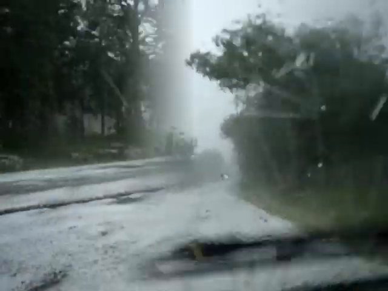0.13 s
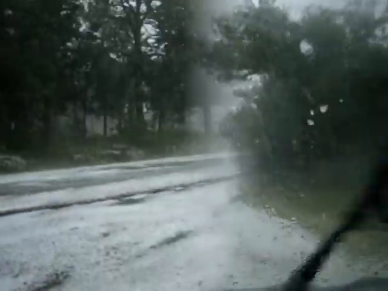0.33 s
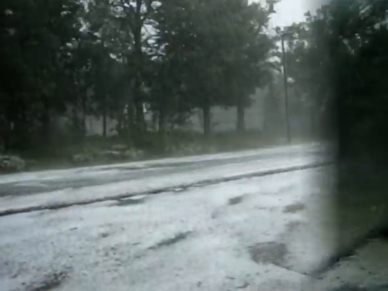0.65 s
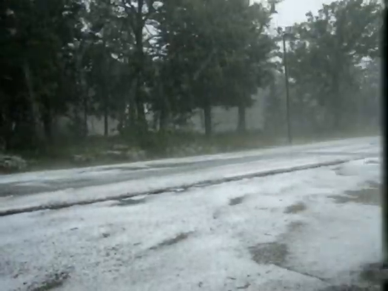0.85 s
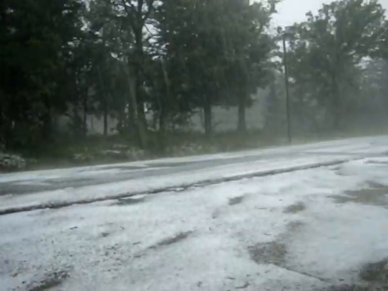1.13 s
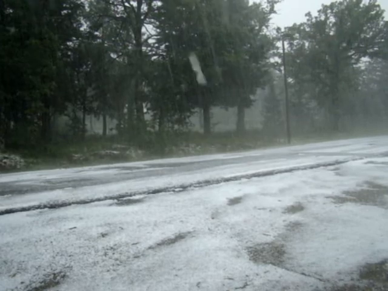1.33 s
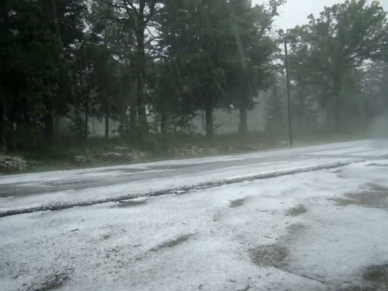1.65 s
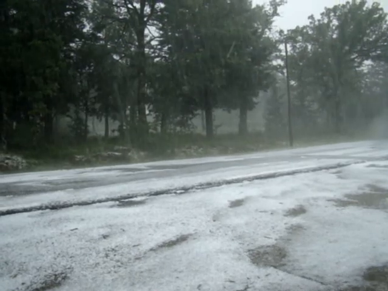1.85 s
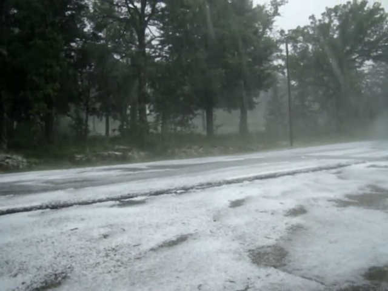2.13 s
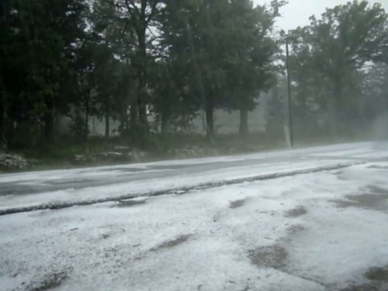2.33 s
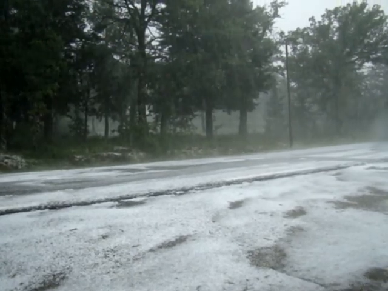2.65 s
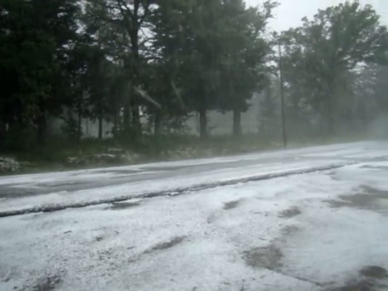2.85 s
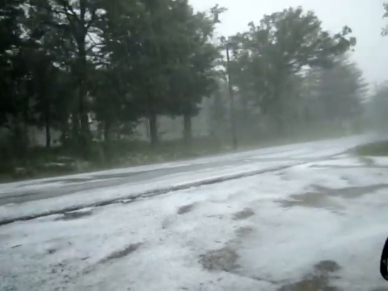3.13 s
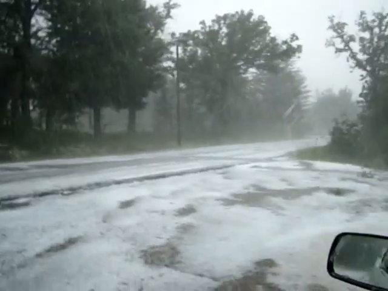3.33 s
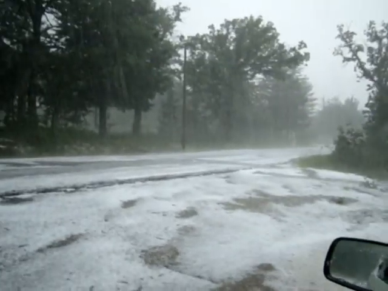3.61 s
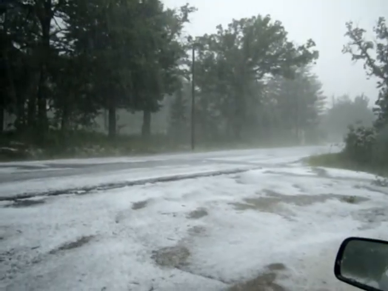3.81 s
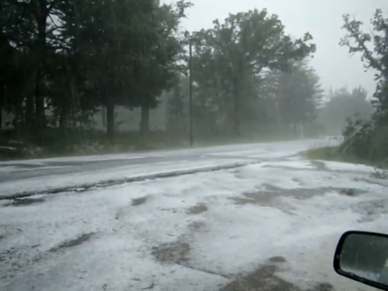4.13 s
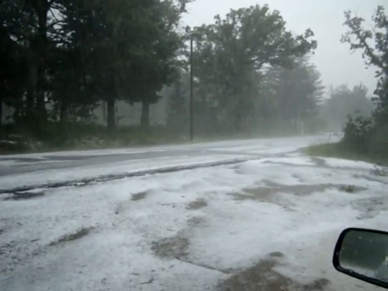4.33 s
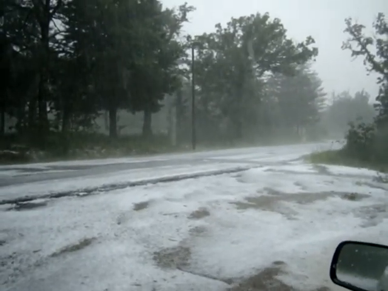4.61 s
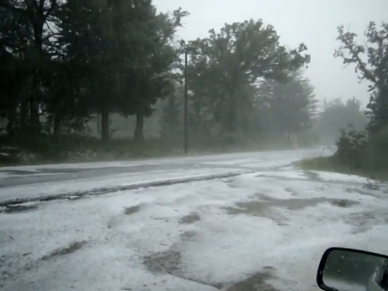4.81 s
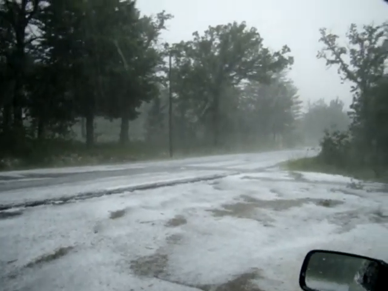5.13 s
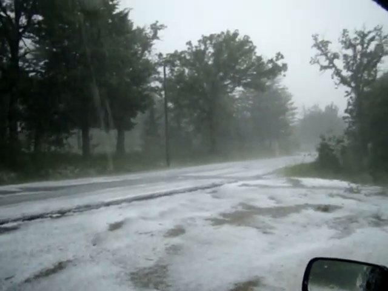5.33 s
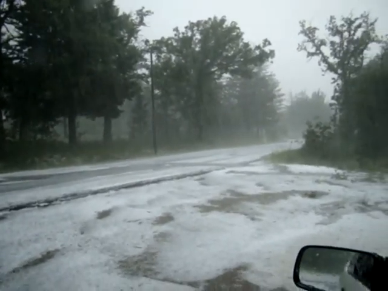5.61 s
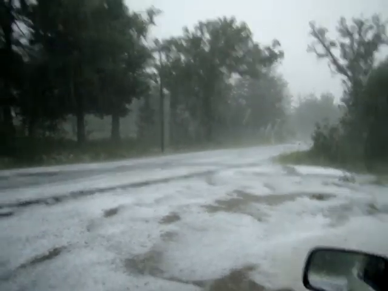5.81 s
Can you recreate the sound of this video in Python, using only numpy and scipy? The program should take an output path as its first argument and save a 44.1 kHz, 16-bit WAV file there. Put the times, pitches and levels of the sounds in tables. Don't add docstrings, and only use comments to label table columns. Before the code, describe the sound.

A violent hailstorm beats on a parked car, heard close up from the cabin in mono through a small, straining microphone. From the start, a dense wash of rain and small hail roars steadily, with fine, rattling patter inside it. Large stones crack at once and again around 0.3 seconds, short and glassy, with dull roof knocks between. At about 0.9 seconds the sound shifts from behind the windscreen to an open side window, becoming a little fuller and more exposed. Hard pops near 1.3, 2.0 and 2.9 seconds hit the microphone itself, and the whole storm ducks for an instant before springing back. Clusters of bright cracks come around 1.6, 2.8 and 3.3 seconds, with hollow metal raps scattered throughout. The roar flutters in brief surges and gaps. Sharp strikes continue near 4.7 and 5.4 seconds, then a final flurry of knocks runs to six seconds, with no let-up.

```python
import sys
import numpy as np
from scipy import signal
from scipy.io import wavfile
from scipy.ndimage import uniform_filter1d

SR = 44100
rng = np.random.default_rng(int(sys.argv[2]) if len(sys.argv) > 2 else 0)


def volts_from_db(level):
    exponent = np.asarray(level, float) / 20
    return 10 ** exponent


def int16_out(signal):
    q = np.round(np.clip(np.atleast_2d(signal).T, -1, 1) * 32767)
    wavfile.write(sys.argv[1], SR, q.astype(np.int16))


N = 263277
CUT_S = 0.88


def evened(x):
    return x / np.sqrt(np.mean(x ** 2) + 1e-20)


def read(points, hz):
    f, value = np.transpose(points)
    return np.interp(np.log(hz + 1), np.log(f + 1), value)


def add(mix, s, sound):
    part = mix[round(s * SR):][:len(sound)]
    part += sound[:len(part)]


def train(per_s, spread_db):
    size = volts_from_db(spread_db * np.minimum(rng.exponential(1, N), 5))
    return size * (rng.random(N) < per_s / SR)


def burst(hz, t60, width, count=1800):
    t = np.arange(count) / SR
    modes = hz * np.exp(width * rng.standard_normal((9, 1)))
    life = t60 * rng.uniform(0.14, 1, (9, 1))
    swing = np.sin(2 * np.pi * np.minimum(modes, SR / 4) * t)
    ring = (-swing * volts_from_db(-60 * t / life)).sum(0)
    return ring / abs(ring).max()


GLASS_T60, ROOF_T60 = 0.0056, 0.013


def strays(count=60):
    level_db, spread_db, behind_glass_db = -11.5, 1, -4
    pitch_hz, pitch_spread = 4600, 0.097
    times = (np.arange(count) + rng.random(count)) / count * N / SR
    rows = []
    for s, (b, c) in zip(times, rng.standard_normal((count, 2))):
        peak_db = level_db + spread_db * b + behind_glass_db * (s < CUT_S)
        rows.append((s, peak_db, pitch_hz * np.exp(pitch_spread * c), GLASS_T60))
    return rows


# (time [s], peak level [dB], pitch [Hz])
GLASS_STONES = [(.006, -8.5, 3560), (0.2908, -16, 3800), (.315, -10, 3380), (.334, -5, 3760),
                (1.022, -5, 5670), (1.0333, -8, 3550), (1.197, -5.5, 4630), (1.3848, -15, 3610),
                (1.5596, -2, 4570), (1.569, -8, 4830), (1.6022, -3.5, 5110), (1.643, -3, 5350),
                (1.9801, -8, 5300), (2.142, -11, 4600), (2.7542, -6, 3950), (2.807, -3.5, 5300),
                (2.865, -9, 4400), (3.023, -11, 4860), (3.1687, -4.5, 6800), (3.314, -6, 5330),
                (3.357, -9, 4600), (3.4603, -2.5, 5060), (3.7526, -14, 4540), (4.2975, -5, 5030),
                (4.663, -1.5, 5500), (4.879, -6.5, 3760), (5.366, -0.5, 5320), (5.5067, -14, 4300),
                (5.528, -11, 4200), (5.8815, -9, 4790)]
# (time [s], peak level [dB], pitch [Hz])
ROOF_STONES = [(.006, -13, 1720), (0.5195, -19, 1540), (0.6288, -12, 1330), (1.0336, -9, 1490),
               (1.1612, -11, 1330), (1.378, -12, 1500), (1.7438, -11, 1230), (1.9952, -15, 1180),
               (2.513, -8.5, 1460), (2.6012, -10, 1310), (2.6253, -12, 1460), (3.1062, -14, 1270),
               (3.3138, -13, 1420), (3.8923, -9.5, 1470), (4.0782, -11.5, 1350), (4.0876, -15, 1430),
               (4.5981, -14, 1260), (4.9665, -13, 1180), (5.415, -14, 1540), (5.4896, -12, 1550),
               (5.5517, -8, 1420), (5.6929, -9, 1250), (5.949, -15, 1330)]


def stones():
    out, t = np.zeros(N), np.arange(1800) / SR
    hits = [(s, db, hz, GLASS_T60) for s, db, hz in GLASS_STONES]
    hits += [(s, db - 1, hz, ROOF_T60) for s, db, hz in ROOF_STONES]
    for s, peak_db, hz, t60 in hits + strays():
        splash = signal.butter(2, [0.6 * hz, 1.6 * hz], "bandpass", fs=SR, output="sos")
        shards = evened(signal.sosfilt(splash, rng.standard_normal(len(t)))) * volts_from_db(-60 * t / 0.059)
        onset = 1 - np.exp(-t * hz / 0.6)
        ring = burst(hz, 2 * t60 + 24 / hz, 0.13) * onset
        add(out, s, volts_from_db(peak_db + 2) * (ring + volts_from_db(-17) * shards))
    return signal.sosfilt(signal.butter(4, 380, "highpass", fs=SR, output="sos"), out)


# (time
# [s], limiter depth [dB], tick peak level [dB], bass shove level [dB])
STRIKES = [(0.1975, -4.5, -8, -56), (0.4093, 1, 2, -55), (0.8463, 1.6, -14, -62), (1.034, -0.5, -6, -57),
           (1.1635, 1.5, 6, -55), (1.2963, 7, 11, -45), (1.505, -1.5, -28, -47), (1.611, 3.3, -14, -49),
           (1.706, -1, 0, -59), (2.006, 8, 12.5, -38), (2.164, 2, -3, -56), (2.1913, 0, -4, -53),
           (2.4816, 4, -10, -47), (2.549, 3.2, 5, -48), (2.888, 6.5, 6, -54), (3.0037, 3, -14, -65),
           (3.3929, -1.5, -5, -59), (3.424, 5, -28, -64), (3.704, 1.6, -12, -47), (3.856, 4.6, -4, -52),
           (3.9902, 4, -6, -63), (4.099, 3.5, -15, -54), (4.6303, 4.5, -24, -48), (4.665, 3.5, -26, -54),
           (4.8476, -3, -11, -60), (4.922, 3, -16, -55), (5.1173, 2, -20, -47), (5.3662, -3, 3, -80),
           (5.5397, -1.0, -13, -50), (5.884, -5.5, -4, -60)]


def spikes():
    ticks, shoves = volts_from_db(-24) * train(120, 2.5), volts_from_db(-16) * train(15, 2.2)
    for s, _, peak_db, shove_db in STRIKES:
        ticks[round(s * SR)] += volts_from_db(peak_db - 10)
        shoves[round(s * SR)] += volts_from_db(shove_db + 44) + volts_from_db(peak_db - 20)
    u = np.arange(-40, 41)
    tick = (1 - 2 * (u / 3.67) ** 2) * np.exp(-(u / 2.96) ** 2)
    window = np.hanning(len(u))
    tick = tick - tick.sum() * window / window.sum()
    shove = np.exp(-(u / 9) ** 2)
    shove = shove / shove.sum()
    return -signal.oaconvolve(ticks, tick, "same") - signal.oaconvolve(shoves, shove, "same")


def patter():
    total = np.zeros(N)
    for hz in 1300 + 8200 * rng.random(36) ** 1.097:
        ring = burst(hz, 0.009 + 22 / hz, 0.2)
        total += signal.oaconvolve(train(30, 2.3), ring / np.linalg.norm(ring))[:N]
    return evened(total)


def wash():
    frames = N // 64 + 5
    a, b, patches = rng.standard_normal((frames, 129, 3)).T
    patches = evened(uniform_filter1d(uniform_filter1d(patches, size=9, axis=0), size=9, axis=1))
    flicker = evened(uniform_filter1d(rng.standard_normal(frames), size=14))
    landing = rng.exponential(1, frames) * (rng.random(frames) < 0.09)
    volleys = signal.lfilter([1], [1, -0.82], landing)
    shared_db = 0.7 * flicker + 1.3 * evened(volleys - volleys.mean())
    reach = np.interp(np.arange(129), [1, 12], [0.1, 1])
    z = (a + 1j * b) * volts_from_db(1.12 * patches + np.outer(reach, shared_db))
    return evened(signal.istft(z, nperseg=256, noverlap=192)[1][:N])


# (time [s], level [dB], brightness [dB])
STORM = [(0, -26.5, -3), (.06, -30, 1), (.2, -30, -1.5), (.85, -28, 0.5), (.92, -25, -2), (1.4, -28, -0.5),
         (1.7, -27, -1), (2, -26, .5), (2.6, -25, -1.5), (3.2, -26.6, 0), (3.8, -26, -1),
         (4.1, -25.5, -1.5), (4.4, -26.5, -0.5), (5, -26, -1.5), (5.5, -27, -2), (5.75, -27, -1.5),
         (5.97, -27, -1.5)]
# (frequency [Hz], level per Hz [dB])
COLOUR = [(24, -50), (40, -28.5), (156, -19), (248, -14.5), (299, -8), (544, -3.5), (1310, -0.5),
          (2230, -4.5), (4770, 0.5), (6020, -1.5), (9330, -3.5), (10000, -1.5), (13000, -38), (22000, -120)]
# (frequency [Hz], change [dB])
WINDSCREEN = [(300, -0.5), (1200, 0), (2300, 2), (3200, 1.5), (4600, -2.5), (9000, -2)]


def storm():
    hz, t, z = signal.stft(wash() + volts_from_db(-5.5) * patter(), SR, nperseg=1024)
    z /= np.sqrt(uniform_filter1d((abs(z) ** 2).mean(1), size=9))[:, None]
    bass_loss_db = 36 * np.clip(np.log2(125 / (hz + 10)), 0, 3)
    z *= volts_from_db(read(COLOUR, hz) - bass_loss_db)[:, None]
    s, *columns = np.transpose(STORM)
    level_db, bright_db = (np.interp(t, s, c) for c in columns)
    body_db = 0.17 * level_db - 0.31 * bright_db
    fizz_db = 0.1 * level_db + 0.77 * bright_db
    low = np.interp(hz, [1800, 2800], [1, 0])
    high = np.interp(hz, [5200, 6800], [0, 1])
    tilt_db = np.outer(low, body_db - body_db.mean()) + np.outer(high, fizz_db - fizz_db.mean())
    behind_glass = np.clip((CUT_S - t) / 0.24, 0, 1)
    tilt_db = tilt_db + np.outer(read(WINDSCREEN, hz), behind_glass)
    z /= np.sqrt(np.mean(abs(z[(hz > 2500) & (hz < 6000)]) ** 2))
    return signal.istft(z * volts_from_db(level_db + tilt_db - 19), SR, nperseg=1024)[1][:N]


# (time [s], change [dB], width at half height [s])
SWELLS_AND_LULLS = [(0.112, 1.5, 0.02), (0.293, 4, 0.042), (0.627, 2, 0.017), (1.159, 1, 0.018), (1.383, 4, 0.014),
                    (1.604, 0.5, 0.02), (1.648, 2, 0.016), (1.736, 3, 0.015), (1.999, 0.5, 0.018), (3.257, 2.0, 0.1),
                    (3.362, 2, 0.022), (3.468, -1.5, 0.022), (3.502, 2, 0.018), (3.56, 1, 0.02), (4.087, 1, 0.018),
                    (4.59, 1.5, 0.07), (4.969, 2.5, 0.02), (5.316, 0.3, 0.03), (5.378, 0, 0.024), (5.529, 2, 0.02),
                    (5.607, 2.5, 0.022), (5.695, 2, 0.042), (5.739, 2.4, 0.036), (5.964, 1.5, 0.018),
                    (0.373, -1, 0.016), (0.716, -3.5, 0.018), (0.894, -2.5, 0.02), (0.997, -3, 0.032),
         (1.078, -2, 0.02), (1.684, -4, 0.013), (1.762, -2.5, 0.022), (1.896, -5.5, 0.02),
         (1.946, -4, 0.026), (2.113, -2, 0.022), (2.233, -3.5, 0.034), (2.293, -1.5, 0.012),
         (2.385, -3, 0.032), (2.7, -4, 0.022), (2.802, -3.5, 0.041), (2.933, -2, 0.048), (3.131, -3, 0.022),
         (3.177, -4, 0.015), (3.299, -3.2, 0.036), (3.678, -2.5, 0.0092), (3.841, -3.5, 0.029),
         (4.346, -2, 0.016), (4.508, -2, 0.056), (4.785, -4, 0.051)]


def surges():
    t = np.arange(N // 32 + 1) * 32 / SR
    change_db = np.zeros(len(t))
    for s, db, width in SWELLS_AND_LULLS:
        change_db += db * np.exp(-np.log(16) * ((t - s) / width) ** 2)
    return volts_from_db(1.25 * np.repeat(change_db, 32)[:N])


def scene():
    return (surges() * storm() + stones() + spikes())[None]


def limited(x):
    t = np.arange(4000) / SR
    held = (1 - np.exp(-t / 0.00071)) / (1 + np.exp((t - 0.011) / 0.00032))
    creep = 0.55 * (1 - held) * (1 - np.exp(-t / 0.0049)) * np.exp(-t / 0.038)
    trips = np.zeros(N)
    for s, depth_db, *_ in STRIKES:
        trips[round(s * SR) + 8] += depth_db + 2
    return x / volts_from_db(signal.oaconvolve(trips, held + creep)[:N])


def roll_off(x):
    return signal.sosfilt(signal.butter(12, 11310, fs=SR, output="sos"), x)


def record(dry):
    ducked = limited(dry)
    mix = ducked / (1 + (ducked / 0.75) ** 6) ** (1 / 6)
    return roll_off(mix)


dry = scene()
out = record(dry)
int16_out(out)
```